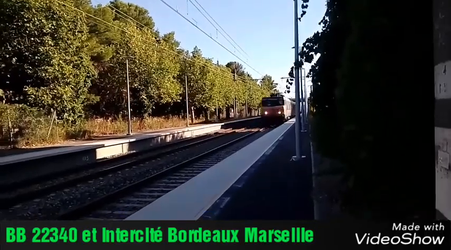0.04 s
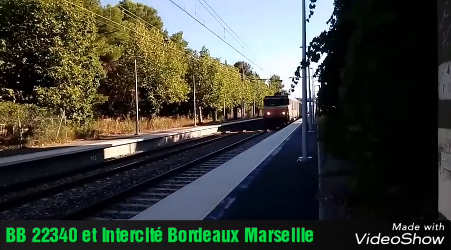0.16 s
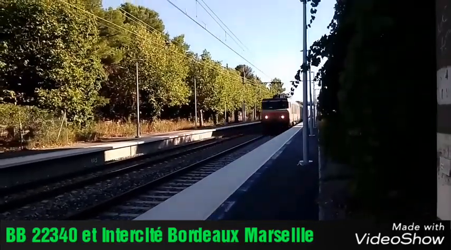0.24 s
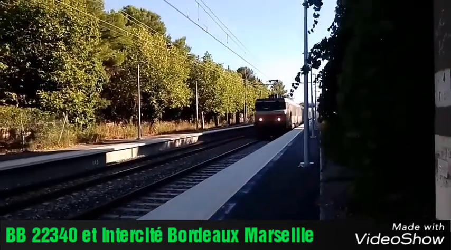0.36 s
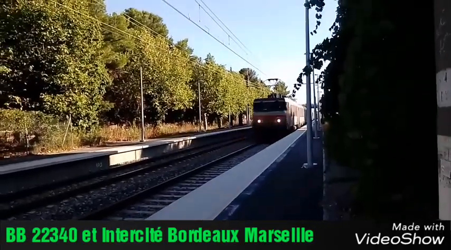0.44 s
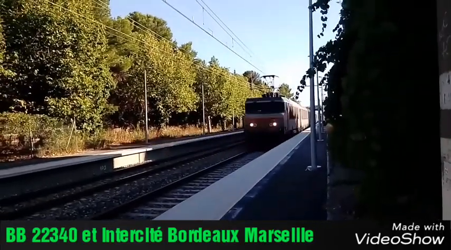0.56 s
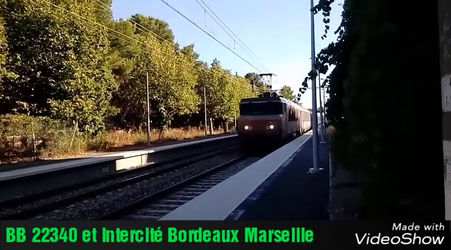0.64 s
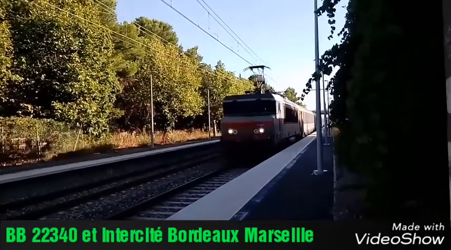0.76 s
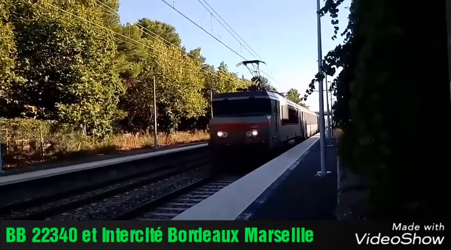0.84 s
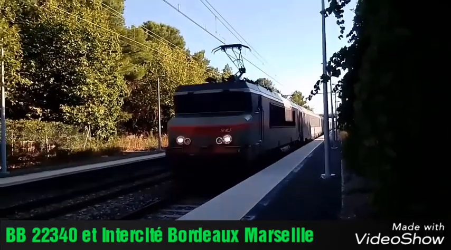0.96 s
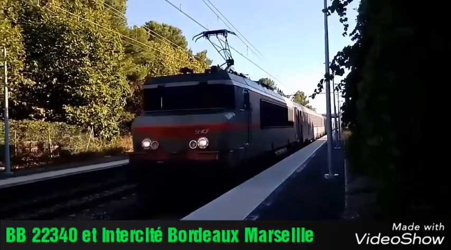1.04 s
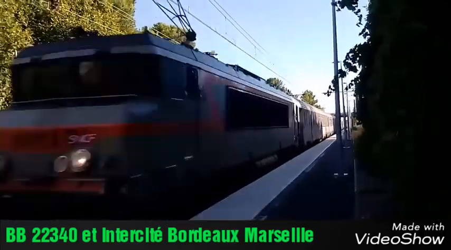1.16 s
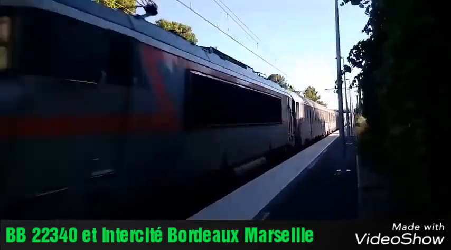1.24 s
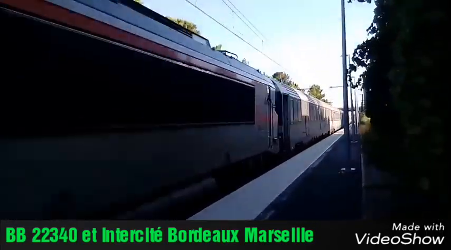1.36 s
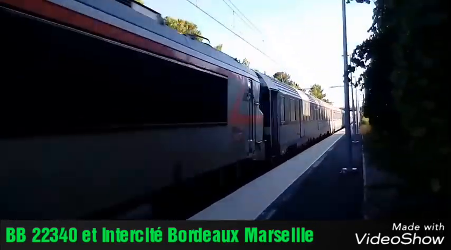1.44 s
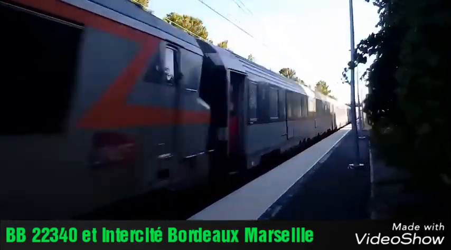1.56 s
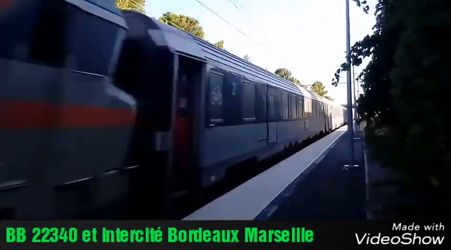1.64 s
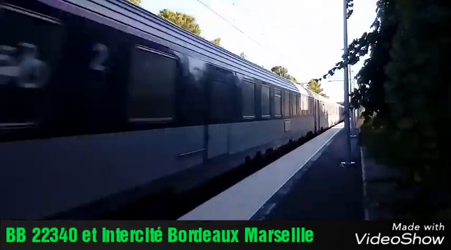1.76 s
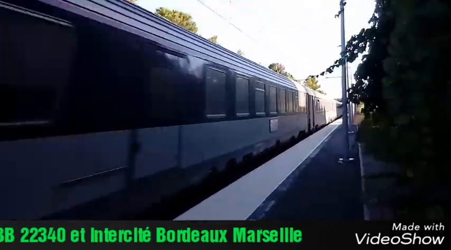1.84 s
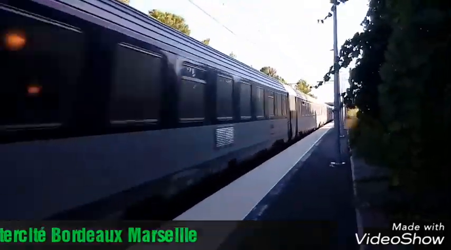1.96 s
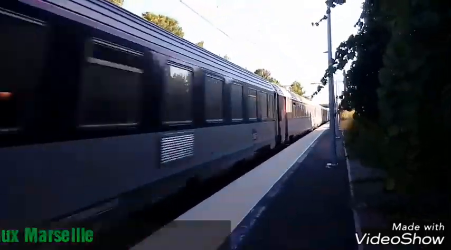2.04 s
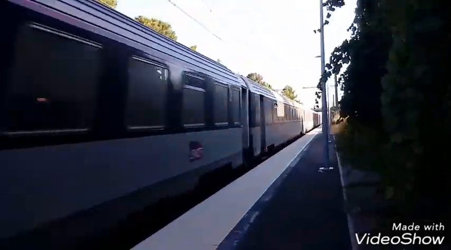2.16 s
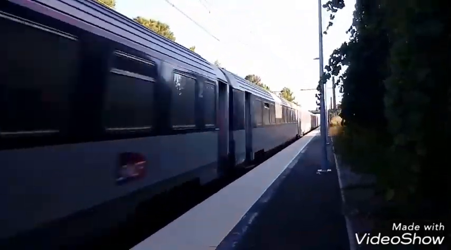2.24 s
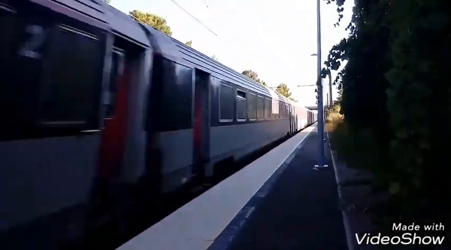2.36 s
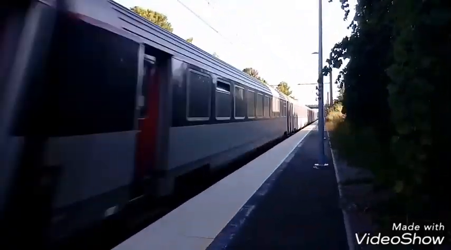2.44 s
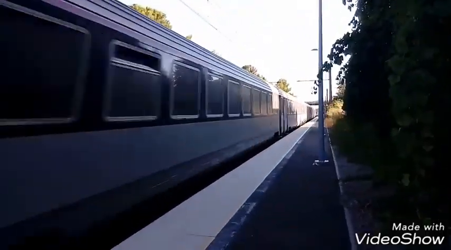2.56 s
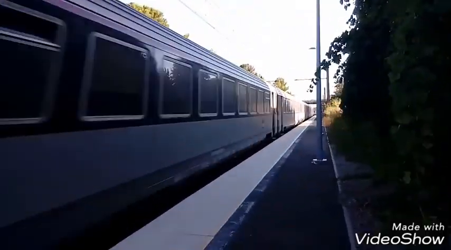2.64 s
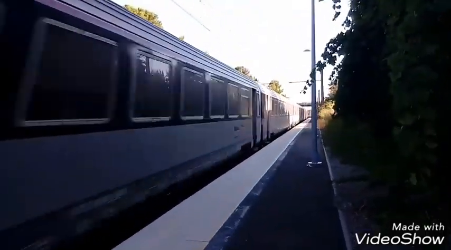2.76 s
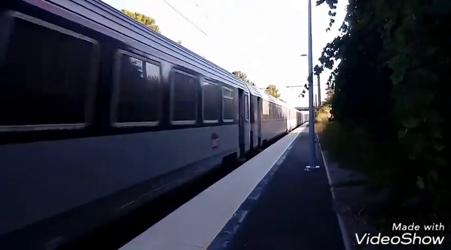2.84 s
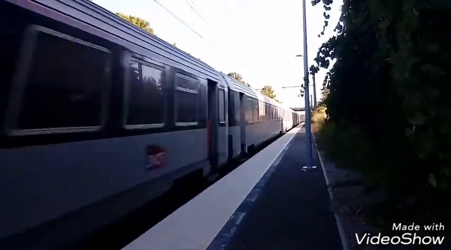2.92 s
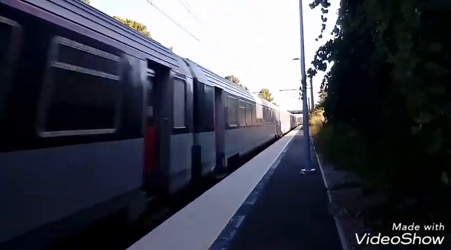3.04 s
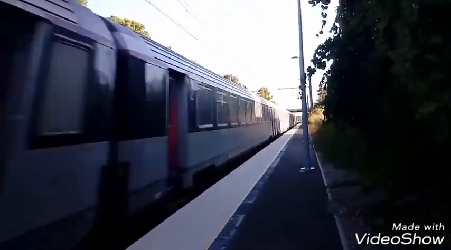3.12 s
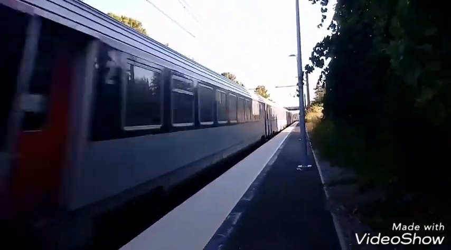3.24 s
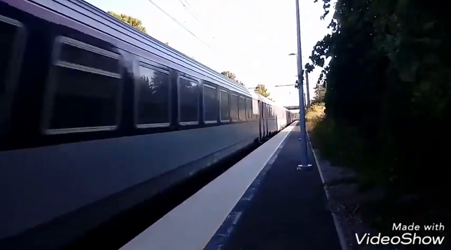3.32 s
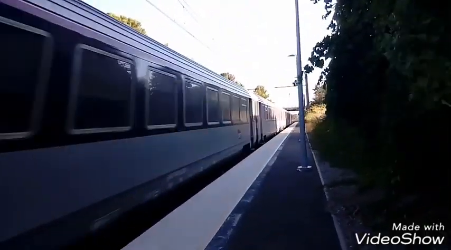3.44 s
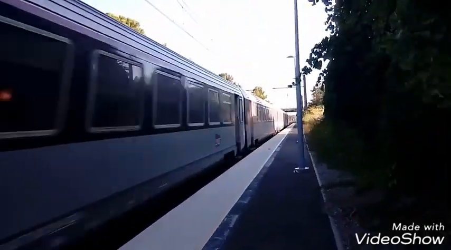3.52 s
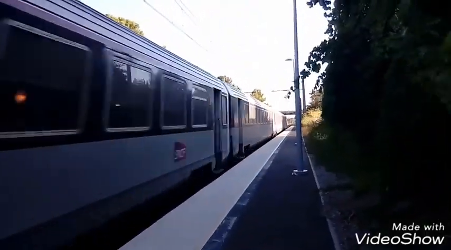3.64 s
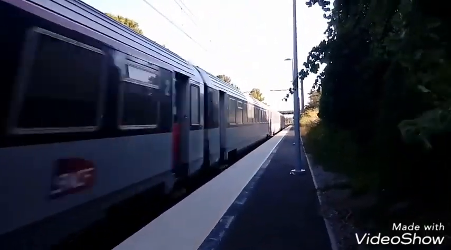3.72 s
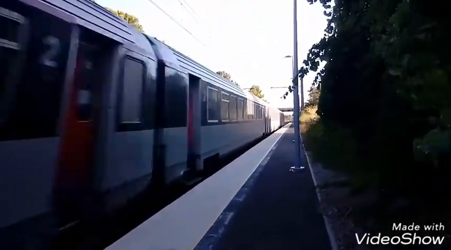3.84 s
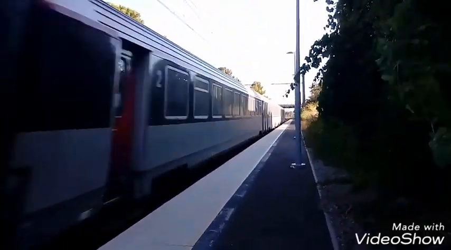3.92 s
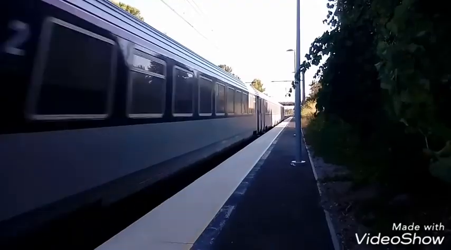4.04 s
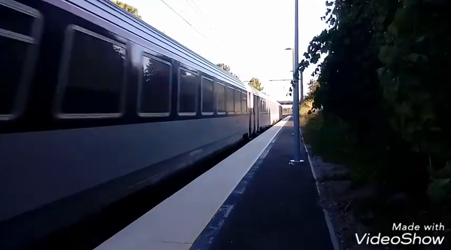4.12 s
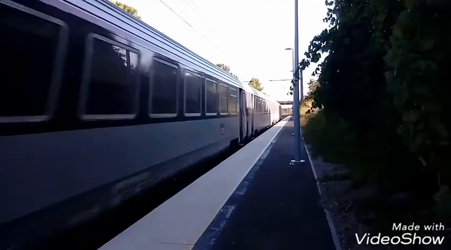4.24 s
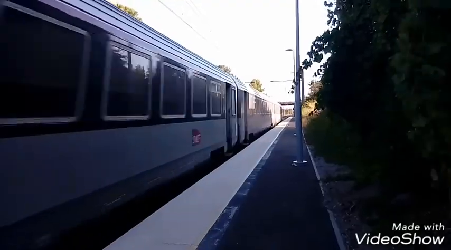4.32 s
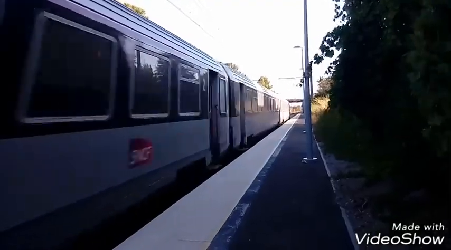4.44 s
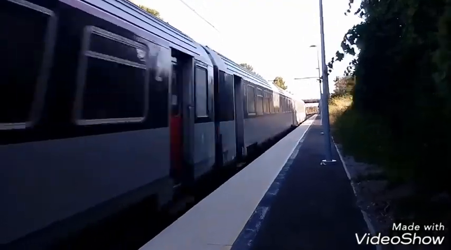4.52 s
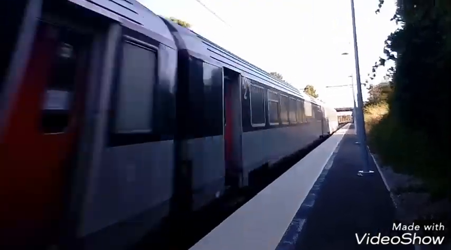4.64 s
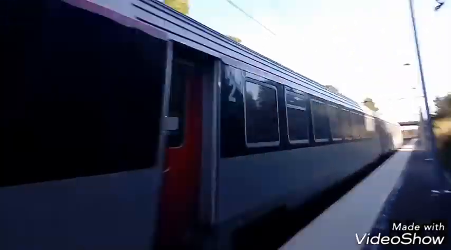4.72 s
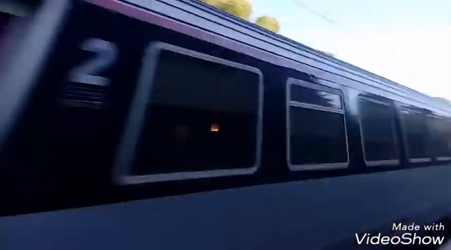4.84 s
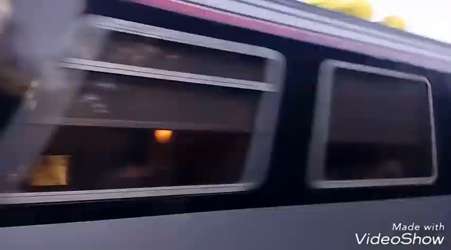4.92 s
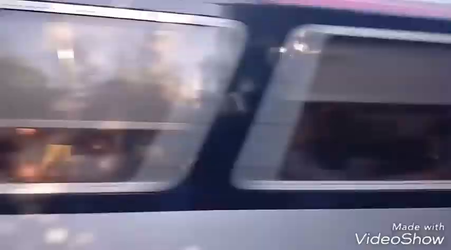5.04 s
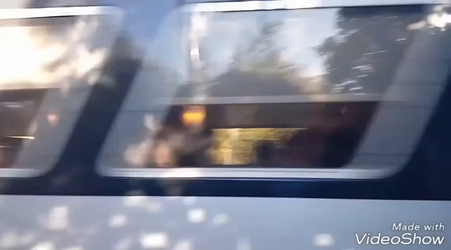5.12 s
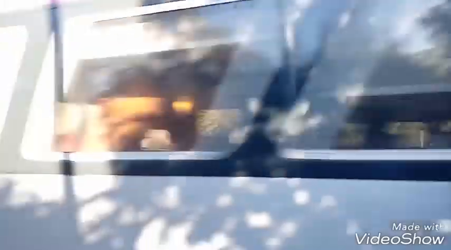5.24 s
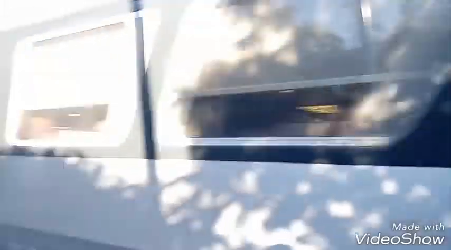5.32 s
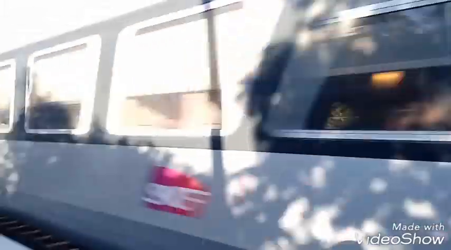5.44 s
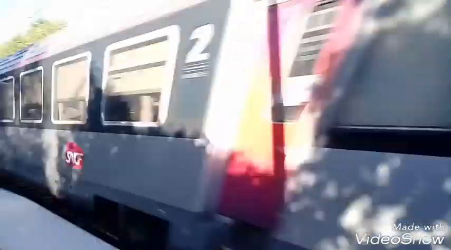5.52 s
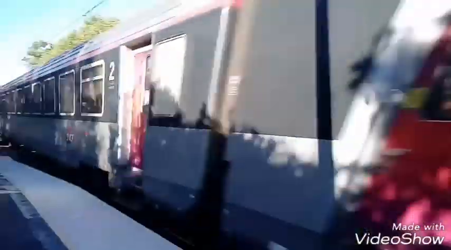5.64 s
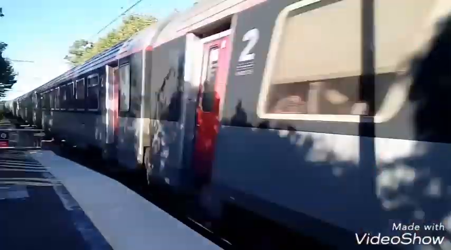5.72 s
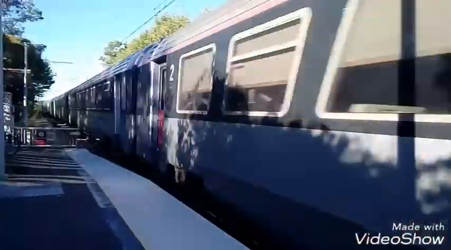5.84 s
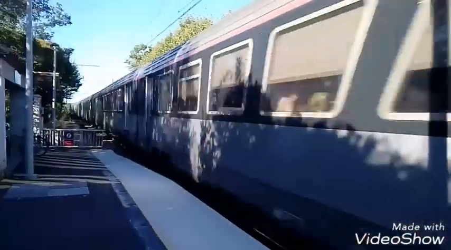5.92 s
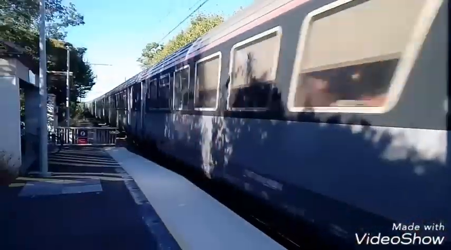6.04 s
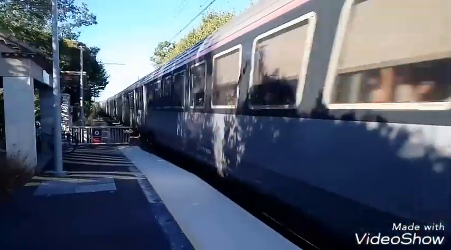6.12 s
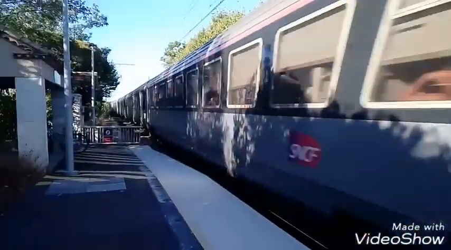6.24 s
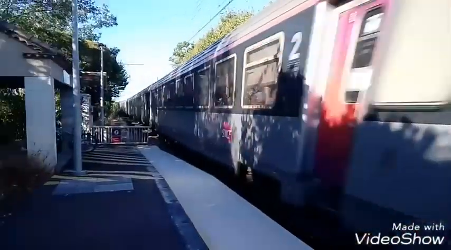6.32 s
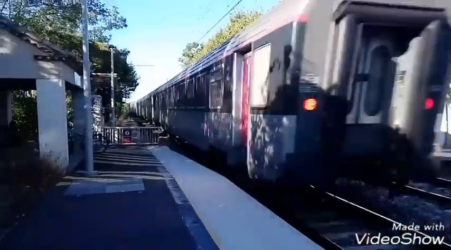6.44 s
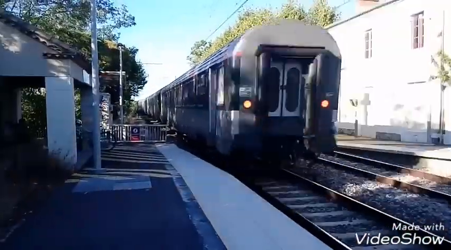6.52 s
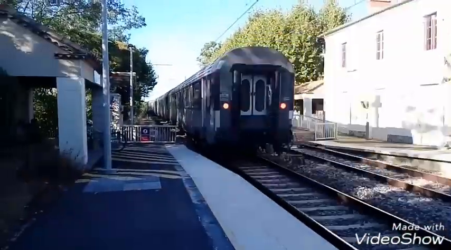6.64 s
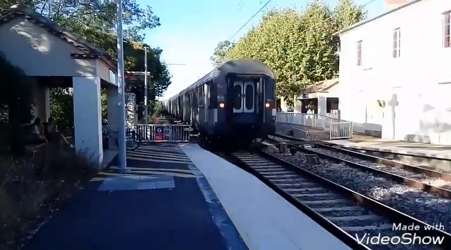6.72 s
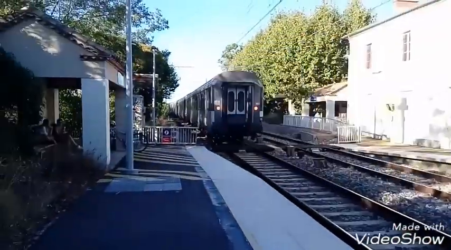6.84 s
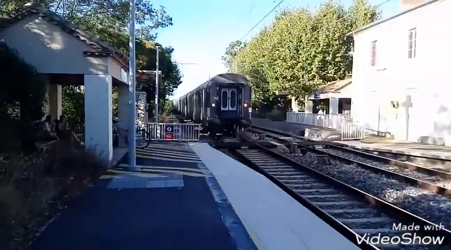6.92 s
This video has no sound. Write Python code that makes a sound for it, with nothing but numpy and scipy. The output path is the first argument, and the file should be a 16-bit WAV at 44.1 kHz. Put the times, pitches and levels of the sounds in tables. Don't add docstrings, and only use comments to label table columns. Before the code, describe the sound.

A fast passenger train passes very close. First comes a thin metallic singing of rails over a growing fan drone and whine; the locomotive sweeps by with a drop in pitch. A broad, dull mid-range roar holds steady under rhythmic swells of ringing, hissing wheels. Turbulent air buffets the plain handheld microphone, with one hard burst of slaps halfway and low thumps later. The treble is muffled.

```python
import sys
import numpy as np
from scipy import signal
from scipy.io import wavfile
from scipy.ndimage import uniform_filter1d

SR = 44100
rng = np.random.default_rng(int(sys.argv[2]) if len(sys.argv) > 2 else 0)


def gain_from_db(level_db):
    decades = np.asarray(level_db, float) / 20
    return 10 ** decades


def unload_audio(sound):
    columns = np.transpose(np.atleast_2d(sound))
    steps = np.round(np.clip(columns, -1, 1) * 32767)
    wavfile.write(sys.argv[1], SR, steps.astype(np.int16))


N = 307377
SPEED_MS = 22.0

# t/s, web ring level/dB, rim ring level/dB, tread hiss level/dB,
# tread brightness level/dB
BOGIE_PASSES = [(1.803, -41, -39.5, -47.5, -11), (1.984, -39, -40, -24.5, -13.5),
                (2.151, -31.5, -42, -33, -11.5), (2.621, -30, -37.5, -23.5, -15.5),
                (2.849, -27.5, -36.5, -35.5, -2), (3.3, -29.5, -38, -30, -8),
                (3.52, -28, -35, -31.5, -10.5), (4.079, -28, -43.5, -30, -16), (4.3, -26, -38, -30, -6.5),
                (4.78, -29.5, -35, -27.5, -15.5), (5.048, -30, -37.5, -28, -19.5),
                (5.549, -30, -39, -25.5, -11.5), (5.779, -29.5, -32, -32, -12.5),
                (6.28, -33, -38, -25, -13), (6.55, -27, -37, -33.5, -5), (6.901, -30, -42, -35.5, -2)]
# t/s, level/dB
LOCO_NEARNESS = [
    (0, -39),
    (.35, -35.5),
    (.6, -32.5),
    (.93, -28),
    (1.55, -23),
    (1.68, -24),
    (1.8, -25.5),
    (2, -23.5),
]


def rms_one(x):
    return x / np.sqrt(np.mean(x ** 2) + 1e-20)


def in_time(rows):
    s, *columns = np.transpose(rows)
    return [np.interp(np.arange(N) / SR, s, c) for c in columns]


def fade(t0, t1):
    return np.clip((np.arange(N) / SR - t0) / (t1 - t0), 0, 1)


def spell(start, length, rise, fall):
    hold = max(length - (rise + fall) / 2, 1e-4)
    corners = start + np.cumsum([-rise / 2, rise, hold, fall])
    return np.interp(np.arange(N), corners * SR, [0, 1, 1, 0])


def drift(rate):
    r = np.exp(-80 * np.pi * rate / SR)
    slow = signal.lfilter([1], [1, -2 * r, r * r], rng.standard_normal(N // 40 + 2002))[2000:]
    return np.interp(np.arange(N) / 40, np.arange(len(slow)), rms_one(slow))


def butterworth(x, order, edge_hz, kind="low"):
    return signal.sosfilt(signal.butter(order, edge_hz, kind, fs=SR, output="sos"), x)


def banded_noise(spectrum, shared_db, own_db, rate):
    hz, level_db = np.transpose(spectrum)
    edges = np.geomspace(hz[0], hz[-1], int(3 * np.log2(hz[-1] / hz[0])) + 2)
    out, together, white = 0, drift(rate), rng.standard_normal((2, N))
    for k, (low, high) in enumerate(zip(edges, edges[1:])):
        centre_db = np.interp(np.log(low * high) / 2, np.log(hz), level_db)
        if centre_db < -60:
            continue
        band = butterworth(white[k % 2], 2, [low, high], "band")
        out = out + gain_from_db(centre_db + shared_db * together + own_db * drift(rate)) * band
    return rms_one(out)


def resonate(noise, hz, width_hz):
    r = np.exp(-np.pi * width_hz / SR)
    section = [1, 0, -1, 1, -2 * r * np.cos(2 * np.pi * hz / SR), r * r]
    return rms_one(signal.sosfilt([section, section], noise))


def gliding(hz, width_hz):
    envelope = drift(width_hz / 2) + 1j * drift(width_hz / 2)
    return np.real(envelope * np.exp(2j * np.pi * np.cumsum(hz) / SR))


def vent_db():
    return -33.5 + 0.77 * (in_time(LOCO_NEARNESS)[0] + 30)


def muffling():
    presses = [
        (3.66, 0.25, -1.5),
        (3.97, 0.031, -4.5),
        (6.807, 0.081, -2.5),
    ]
    return sum(db * spell(s, length, 0.024, 0.018) for s, length, db in presses)


def fizz():
    # t/s of start, length/s
    fizz_spells = [(0.089, 0.025), (0.306, 0.041), (0.414, 0.048), (0.595, 0.04), (.73, 0.03), (0.779, .04),
                   (0.844, 0.1), (1.046, 0.028), (1.243, 0.045), (1.45, 0.044), (1.526, .1), (1.722, 0.08)]
    level = gain_from_db(vent_db() - 36.5 + 3 * drift(20.0))
    spells = sum(spell(s, length, .015, .015) for s, length in fizz_spells) * level
    specks_per_s, speck_s = 3.5, .025
    starts = 2.0 + np.cumsum(rng.uniform(.2, 1.8, 20)) / specks_per_s
    specks = sum(spell(s, speck_s, .01, .01) for s in starts)
    return spells + specks * gain_from_db(-79 + 2 * drift(4.0))


def scattered(x):
    lines = signal.stft(x, SR, nperseg=1024)[2]
    survives = rng.random(lines.shape) < .25
    return rms_one(signal.istft(lines * survives, SR, nperseg=1024)[1][:N])


def thumps():
    # t/s, peak level/dB, f/Hz
    pulses = [(3.6525, -22, 4000), (3.692, -12, 1500), (3.697, -12, 1300), (3.706, -11, 1500),
              (3.716, -16, 3300), (3.741, -21, 4000), (3.761, -8, 1700), (3.803, -13, 2500),
              (3.892, -13, 200), (3.901, -12, 170), (5.412, -22, 120), (5.42, -18, 400), (5.8, -21, 130),
              (5.843, -23, 150), (6.11, -19, 150), (6.215, -15, 320), (6.755, -21, 100), (6.82, -14, 200),
              (6.86, -15, 200), (6.925, -15, 260), (6.94, -23, 110), (3.165, -29, 120), (3.22, -23, 135),
              (4.11, -19.5, 130), (4.245, -21, 105), (4.6, -21, 140), (3.722, -15, 2200),
              (3.731, -18, 3200), (3.668, -16, 1200), (3.808, -15, 1300)]
    half_cycles = .6
    out, t = np.zeros(N + SR), np.arange(-2000, 2000) / SR
    for s, db, hz in pulses:
        start = round(s * SR) - len(t) // 2
        swell = np.exp(-(t * hz / half_cycles) ** 2)
        out[start:start + len(t)] += np.sign(1000 - hz) * gain_from_db(db) * np.cos(2 * np.pi * hz * t) * swell
    return out[:N]


def slaps():
    # t/s, peak level/dB, centre f/Hz, t60/s
    eddies = [
        (3.653, -25, 3500, 0.018),
        (3.692, -18, 1890, 0.054),
        (3.716, -16, 1890, .08),
        (3.741, -22, 3800, .018),
        (3.761, -20, 1800, 0.022),
        (3.801, -12, 2350, 0.034),
        (3.802, -23, 4030, 0.013),
        (4.009, -22, 2600, .05),
        (3.728, -21, 2800, .02),
    ]
    t, white, puffs = np.arange(N) / SR, rng.standard_normal(N), 0
    for s, db, hz, t60 in eddies:
        rasp = rms_one(butterworth(white, 2, [hz / 1.4, hz * 1.4], "band"))
        decay = gain_from_db(db - 60 * np.abs(t - s) / t60)
        puffs = puffs + fade(s - .001, s + .0025) * decay * rasp
    return butterworth(puffs, 3, 4800)


def slipstream():
    # t/s of start, length/s, level/dB, upper edge relative level/dB
    gusts = [(1.864, 0.15, -38, 6), (2.05, 0.67, -40, -4), (3.058, .08, -34, -16), (3.16, 0.19, -37.5, -3),
             (3.528, .05, -27, -1), (3.573, .035, -22.5, 3), (3.612, .025, -21, 5.5),
             (3.647, 0.029, -19.5, 1.5), (3.689, 0.075, -22, 2), (3.792, 0.022, -27.5, 5.5),
             (3.82, .02, -26.5, 2.5), (3.875, .012, -24.5, 5.5), (3.889, .018, -22.5, 2),
             (3.936, 0.046, -22, -1.5), (4, 0.052, -23.5, -5), (4.087, 0.022, -26.5, 3.5),
             (4.123, .02, -28, -0.5), (4.231, 0.042, -28, -0.5), (4.299, .025, -33, 1.5),
             (4.43, 0.063, -36, -13), (4.498, 0.049, -30.5, -12), (4.58, 0.032, -27.5, -15),
             (4.652, 0.1, -44, -7), (5.2, 0.2, -53, -6), (5.36, 0.13, -33.5, -6), (5.408, 0.0183, -25, 7.5),
             (5.518, 0.031, -28, -12), (5.6, 0.083, -31, -7), (5.695, .21, -31.5, -8.5),
             (6.002, 0.14, -25, -4.5), (6.153, 0.15, -31.5, -0.5), (6.199, 0.019, -26.5, 3),
             (6.383, .17, -32.5, -2.5), (6.58, 0.1, -41.5, -14), (6.72, 0.068, -25.5, -6.5),
             (6.799, 0.037, -31, 8), (6.852, 0.11, -24, -6.5)]
    # f/Hz, level/dB per Hz
    buffet_spectrum = [(15, -40.5), (25, -20.5), (96, -2), (204, -2.5), (259, -4), (401, -4.5), (465, -4.5),
                       (600, -8), (900, -19.5), (1170, -21.5), (1980, -120)]
    # t/s, f/Hz, level/dB
    port_whistle = [
        (2.95, 262, -49),
        (3.2, 258, -41),
        (3.3, 250, -29.5),
        (3.35, 240, -32),
        (3.39, 222, -41),
    ]
    rise_s, fall_s, ease, calm_db = 0.014, 0.025, 0.21, -47.5
    lumps = banded_noise(buffet_spectrum, shared_db=1.0, own_db=0.5, rate=50.0)
    low = butterworth(lumps, 2, 260)
    shapes = np.array([spell(s, length, rise_s + ease * length, fall_s + ease * length)
                       for s, length, _, _ in gusts])
    _, _, gust_db, edge_db = np.transpose(gusts)
    low_level = gain_from_db(calm_db) + gain_from_db(gust_db) @ shapes
    edge_level = gain_from_db(calm_db + 6.0) + gain_from_db(gust_db + edge_db) @ shapes
    buffet = low_level * rms_one(low) + edge_level * rms_one(lumps - low)
    whistle_hz, whistle_db = in_time(port_whistle)
    whistle = np.sqrt(2) * gain_from_db(whistle_db) * np.sin(2 * np.pi * np.cumsum(whistle_hz) / SR)
    return buffet * fade(1.96, 1.99) + whistle * fade(2.95, 3.0) * (1 - fade(3.37, 3.4))


def hum():
    # t/s, f/Hz, level/dB
    frame_hum = [
        (0, 67, -43),
        (.8, 67, -39),
        (.95, 67, -48),
        (1.15, 67.1, -40),
        (1.38, 66, -33),
        (1.65, 62.8, -34),
        (1.8, 58.1, -32.5),
        (1.9, 56.2, -55),
        (2.1, 56, -80),
    ]
    hum_hz, hum_db = in_time(frame_hum)
    return gain_from_db(hum_db) * gliding(hum_hz, width_hz=14)


def singing_rails():
    # t/s, level/dB
    singing_level = [(0, -36.5), (.3, -37), (.5, -37), (.75, -34), (.95, -39), (1.2, -36), (1.6, -61.5)]
    # f/Hz, width f/Hz, level/dB
    rail_modes = [(1138, 20, -3), (1228, 20, -3.5), (1843, 130, -6), (3107, 170, -7)]
    modes = sum(gain_from_db(db + 1.1 * drift(4.4)) * resonate(rng.standard_normal(N), hz, width_hz)
                for hz, width_hz, db in rail_modes)
    return gain_from_db(in_time(singing_level)[0]) * rms_one(modes)


def locomotive():
    # t/s, f/Hz, level/dB
    motor_whine = [
        (0, 743, -43),
        (.6, 749, -43),
        (.9, 740, -37),
        (1.2, 731, -33),
        (1.4, 714, -29),
        (1.55, 681.5, -31),
        (1.7, 636, -33),
        (1.85, 618, -38),
        (2, 612, -48),
    ]
    # f/Hz, level/dB per Hz
    blower_spectrum = [(18, -75.5), (30, -37), (64, -7), (130, -10), (190, -4.5), (230, 0), (259, -8),
                       (309, -5.5), (450, -12.5), (600, -8.5), (780, -56), (1320, -120)]
    vent_spectrum = [(760, -40), (1300, 2.5), (1660, 0), (2410, -11.5), (3090, -1), (3550, -12),
                     (3880, -0.5), (6030, -3), (6580, -17.5), (7510, -12), (9760, -47), (16500, -120)]
    blower_db = in_time(LOCO_NEARNESS)[0]
    whine_hz, whine_db = in_time(motor_whine)
    drone = gain_from_db(blower_db) * banded_noise(blower_spectrum, shared_db=0.1, own_db=0.5, rate=9.0)
    whine = gain_from_db(whine_db + 2.8 * drift(9.0)) * gliding(whine_hz, width_hz=50)
    vent = gain_from_db(vent_db()) * banded_noise(vent_spectrum, shared_db=1.0, own_db=2.0, rate=7.6)
    return (drone + whine + vent) * (1 - fade(1.77, 2.03))


def passing_resonances(table, width, steadiness):
    slide = .045
    out, white = np.zeros(N + 2 * SR), rng.standard_normal(N + 2 * SR)
    t = np.arange(-SR // 2, SR // 2) / SR
    for s, hz, length, db in table:
        start = round(s * SR) + SR // 2
        tone = resonate(white[start:start + SR], hz, width * hz)
        flicker = uniform_filter1d(tone ** 2, size=int(SR / hz * 4)) + .05
        tone = rms_one(tone / flicker ** (steadiness / 2))
        emitted = t - slide * (np.hypot(t, length) - length)
        out[start:start + SR] += gain_from_db(db) * np.exp(-2 * (t / length) ** 2) * np.interp(emitted, t, tone)
    return out[SR:SR + N]


def rough_wheels():
    # t/s, f/Hz, length/s, level/dB
    ringing = [(0.944, 4480, 0.13, -46), (1.15, 5800, 0.13, -38.5), (1.6, 6270, 0.103, -40),
               (1.6, 5950, 0.088, -32.5), (1.52, 6200, .12, -40), (1.344, 5350, 0.112, -36),
               (1.564, 5300, .08, -34.5), (1.76, 5100, 0.103, -43), (1.951, 3100, .13, -34),
               (2.051, 4130, .15, -34.5), (2.025, 3550, 0.11, -39.5), (2.099, 5600, 0.19, -41),
               (2.522, 4150, .2, -34), (2.9, 3720, 0.2, -38), (2.476, 3700, .13, -37),
               (2.7, 5440, 0.34, -45), (2.85, 4520, .18, -33), (3.317, 4150, 0.097, -34.5),
               (3.348, 3230, .2, -43), (3.301, 7400, .3, -51), (4.016, 4070, 0.09, -35.5),
               (4.02, 3560, 0.096, -33), (4.0, 3070, 0.13, -39.5), (4.303, 4200, 0.12, -37.5),
               (4.35, 5600, 0.3, -47.5), (4.803, 4070, .13, -35.5), (4.851, 3200, 0.27, -36),
               (4.998, 2710, 0.36, -41.5), (3.9, 5800, .3, -47), (5.721, 4760, .22, -35.5),
               (5.723, 2680, .17, -33), (5.749, 3220, 0.15, -33), (5.697, 5000, 0.37, -43.5),
               (6.15, 2660, 0.11, -33), (6.298, 3220, .22, -30.5), (6.254, 4270, .15, -37.5),
               (5.2, 4870, 0.27, -45), (6.279, 5700, 0.22, -40), (6.348, 2450, 0.14, -31),
               (6.602, 4700, 0.18, -38), (6.95, 3690, 0.071, -39), (1.11, 205, .12, -33.5),
               (1.8, 195, 0.14, -33.5), (1.98, 185, .07, -33.5), (.05, 230, .08, -41),
               (6.4, 2200, .08, -36)]
    return passing_resonances(ringing, width=.07, steadiness=.3)


def narrow_notes():
    # t/s, f/Hz, length/s, level/dB
    sung = [(.9, 230.7, 0.29, -36), (1.55, 224.2, .16, -29), (2.75, 1956, 0.19, -34), (4.65, 1947, .2, -34),
            (6.3, 1950, 0.11, -34.5), (.55, 4160, .2, -50), (.9, 3050, 0.297, -47), (1.0, 4000, .1, -40),
            (1.33, 3900, 0.082, -44), (1.83, 770, .2, -30), (1.9, 1140, .15, -31), (1.92, 2600, .12, -37),
            (2.15, 1803, .25, -32), (2.35, 978, .2, -28.5), (2.52, 2510, .15, -33.5),
            (2.6, 1815, .2, -31.5), (2.8, 1820, .15, -27.5), (2.8, 4120, .08, -36), (3.2, 947, .25, -31),
            (3.32, 1890, .12, -28.5), (3.3, 1707, .15, -34), (4.1, 1794, 0.16, -27.5),
            (4.3, 1710, 0.16, -29.5), (4.22, 1635, .15, -34), (4.78, 1798, .25, -26.5),
            (5.1, 1672, .2, -29), (5.35, 1026, .25, -24), (5.4, 1780, .15, -33), (5.6, 1720, 0.14, -37),
            (5.72, 1604, .25, -31), (5.95, 1810, 0.14, -33), (6.15, 3430, 0.15, -37), (6.35, 1838, .2, -28),
            (6.45, 1740, 0.19, -29.5), (6.68, 1817, .2, -28), (6.7, 3320, .2, -38), (.4, 1140, .12, -38),
            (.52, 1224, .08, -37), (.74, 1231, .12, -36.5), (2.53, 1930, .1, -31.5), (2.23, 1732, .15, -35),
            (2.93, 1680, .12, -36), (3.1, 1630, .1, -31), (3.45, 1770, .2, -35), (4.5, 1830, .15, -34),
            (4.9, 1650, .15, -34), (5.3, 1670, .2, -32.5), (5.55, 1790, .15, -33.5), (6.1, 1600, .25, -34),
            (6.94, 1693, .08, -32)]
    return passing_resonances(sung, width=.03, steadiness=.61)


def rails():
    # t/s, level/dB
    rolling = [(0, -33.5), (.4, -33), (.8, -31.5), (1.1, -27), (1.45, -26), (1.7, -23.3), (1.9, -21),
               (2.15, -20.5), (2.8, -21), (3.2, -20), (3.5, -20), (4.3, -20.5), (4.7, -20), (5.4, -19),
               (6.0, -19.5), (6.72, -22), (6.97, -23)]
    # f/Hz, level/dB per Hz
    roar_spectrum = [(24, -52), (40, -24), (106, -17.5), (204, -30), (335, -18.5), (460, -19.5), (630, -5),
                     (968, 2.5), (1460, -11.5), (1790, -13), (2400, -15.5), (3120, -45), (5280, -120)]
    hiss_spectrum = [(760, -34), (1300, -13.5), (1460, -6), (1780, 2.5), (2140, -20), (2550, -10.5),
                     (2810, -9), (4330, -10.5), (5810, -18), (6900, -27.5), (7510, -37), (9760, -65.5),
                     (16500, -120)]
    peak_hz = 951 + 25.01 * drift(3.0)
    roar = banded_noise(roar_spectrum, shared_db=-0.5, own_db=1.0, rate=7.4)
    roar = roar + gain_from_db(-17.5) * fade(0.93, 2.6) * gliding(peak_hz, width_hz=150)
    gap_hz, gap_width_hz, gap_share = 995, 210, 0.55
    gap = signal.lfilter(*signal.iirpeak(gap_hz, gap_hz / gap_width_hz, fs=SR), roar)
    roar = roar - gap_share * (1 - fade(1.2, 2.4)) * gap

    hiss = banded_noise(hiss_spectrum, shared_db=0.0, own_db=1.5, rate=9)
    body = butterworth(hiss, 2, 4600)
    top = butterworth(hiss, 2, 4600, "high")
    hidden = fade(1.3, 2.0)
    reach_m = 3.44
    s, _, _, hiss_db, bright_db = np.transpose(BOGIE_PASSES)
    near = 1 / (1 + (SPEED_MS * (np.arange(N) / SR - s[:, None]) / reach_m) ** 2)
    level = np.sqrt(gain_from_db(2 * hiss_db) @ near)
    top_level = np.sqrt(gain_from_db(2 * (hiss_db + bright_db + 3.0)) @ near)
    pressed_db = muffling()
    treads = hidden * gain_from_db(pressed_db) * (level * body - top_level * gain_from_db(pressed_db) * top)
    return gain_from_db(in_time(rolling)[0] + pressed_db) * rms_one(roar) + treads


def wheels():
    # f/Hz, width f/Hz, level/dB
    web = [(1702, 80, -2), (1809, 45, 0), (1930, 80, -1.5)]
    rim = [(2580, 85, -1), (3150, 190, -5), (3660, 350, -11.5), (4233, 300, -2), (4760, 330, -6.5)]
    distance_m = 4.0
    modes = np.array([gain_from_db(2.0 * drift(12.0)) * resonate(rng.standard_normal(N), hz, width_hz)
                      for hz, width_hz, _ in web + rim])
    mode_db = np.array(web + rim)[:, 2]
    is_web = np.arange(len(modes)) < len(web)
    luck = rng.standard_normal((len(BOGIE_PASSES), len(modes) + 1))
    t, out = np.arange(-SR // 2, SR // 2) / SR, np.zeros(N + 2 * SR)
    r = np.hypot(distance_m, SPEED_MS * t)
    gain = (distance_m / r) ** 0.51 * np.sqrt(np.hanning(len(t)))
    for (s, web_db, rim_db, _, _), chance in zip(BOGIE_PASSES, luck):
        bogie_db = np.where(is_web, web_db - 4.0, rim_db - 3.5)
        mix = gain_from_db(mode_db + bogie_db + 1.8 * chance[:-1]) @ modes
        emitted = (s + (t - r / 343) * (1 + .006 * chance[-1])) * SR
        start = round(s * SR) + SR // 2
        out[start:start + len(t)] += gain * np.interp(emitted % (N - 1), np.arange(N), mix)
    return out[SR:SR + N]


def flinching():
    dips = [
        (3.675, .018, -4.5),
        (3.704, .01, -3),
        (3.75, .032, -2),
        (3.834, .035, -0.5),
        (3.871, .005, -3.5),
        (5.385, .02, 0),
        (6.79, .03, -1.5),
    ]
    return gain_from_db(sum(db * spell(s, length, .006, 0.011) for s, length, db in dips))


def scene():
    train = rails() + gain_from_db(.5 * muffling()) * wheels() + locomotive() + singing_rails()
    train = train + rough_wheels() + narrow_notes()
    mono = flinching() * (train + slipstream()) + thumps() + hum() + slaps()
    return np.tile(mono, (2, 1))


def drop_weak_lines(x):
    # f/Hz, level/dB
    floor_curve = [(6300, -105), (6750, -84), (6950, -71), (7600, -71), (7750, -64), (8300, -68), (8700, -70),
                   (15500, -72)]
    hz, _, lines = signal.stft(x, SR, "cosine", 2048, 1024, boundary="even", padded=False)
    loudness = np.sqrt(np.sum(np.abs(lines) ** 2, axis=0))
    floor_lift = (loudness / .1) ** .6
    floor = np.outer(gain_from_db(np.interp(hz, *np.transpose(floor_curve))), floor_lift)
    chance = rng.standard_normal((len(hz) // 12 + 1, len(loudness))).repeat(12, axis=0)[:len(hz)]
    floor = floor * gain_from_db(np.where(hz < 7900, 3.5, .6)[:, None] * (chance + chance[0]))
    kept = signal.istft(lines * (np.abs(lines) > floor), SR, "cosine", 2048, 1024)[1]
    return np.pad(kept, (0, 2048), "reflect")[:N]


def low_pass(x):
    return signal.sosfilt(signal.butter(12, 15500, fs=SR, output="sos"), x)


def record(dry):
    rounded = .5 * np.tanh(dry[0] / .5)
    dull = signal.sosfilt(signal.cheby2(10, 60, 9000, fs=SR, output="sos"), rounded)
    high, higher = (rms_one(butterworth(rng.standard_normal(N), 5, band, "band"))
                    for band in ([7700, 11500], [11500, 15300]))
    thin_hiss = gain_from_db(vent_db() - 24.0) * (1 - fade(1.84, 1.85)) * high
    mono = drop_weak_lines(dull + thin_hiss) + fizz() * scattered(higher)
    late = np.roll(mono, 700)
    coloured = 2.6 * late - 17.0 * np.gradient(np.gradient(late))
    mismatch = gain_from_db(-58.0 + 10.0 * drift(14.0)) * coloured
    return low_pass(mono + mismatch * [[1], [-1]])


dry = scene()
out = record(dry)
unload_audio(out)
```